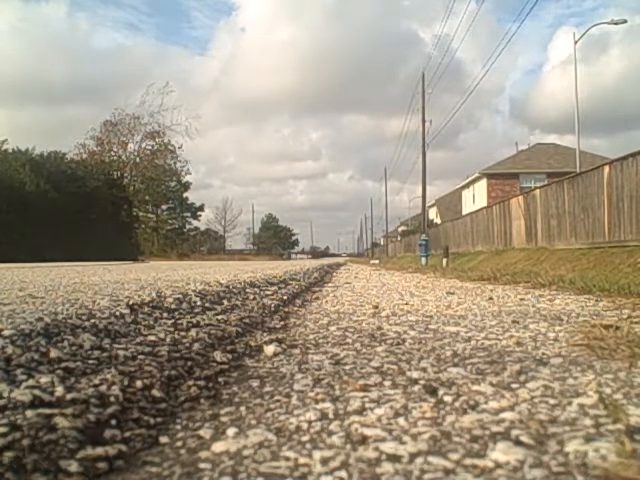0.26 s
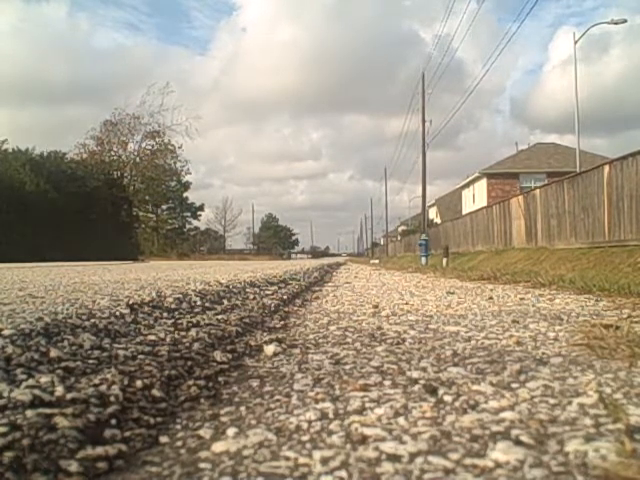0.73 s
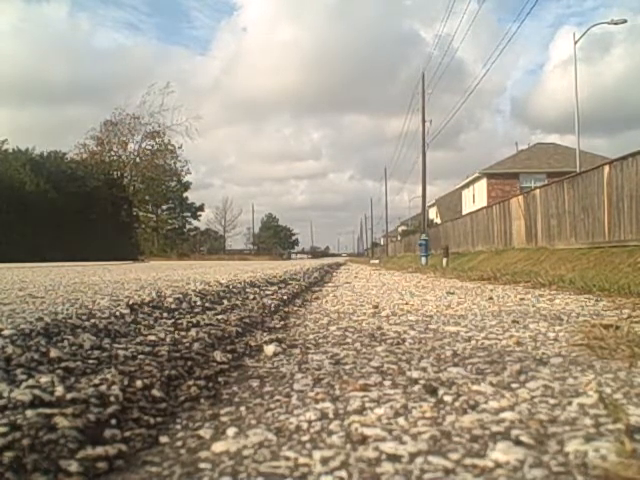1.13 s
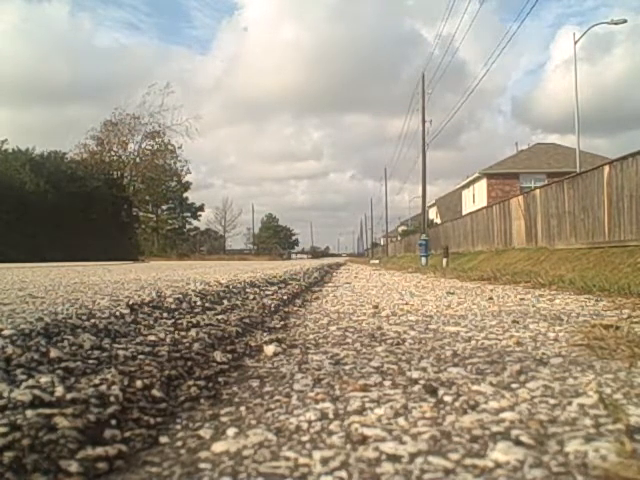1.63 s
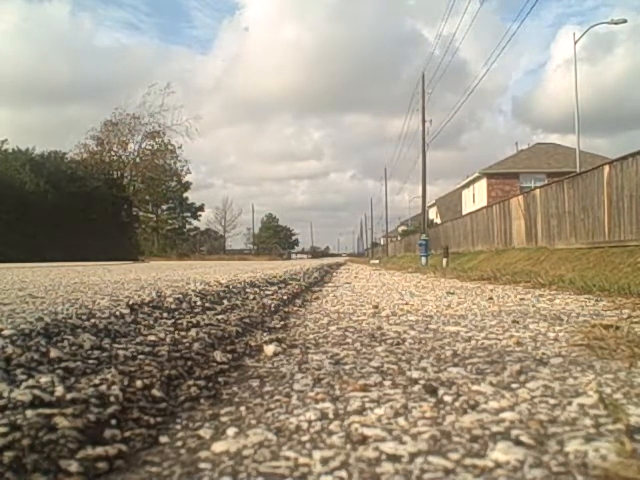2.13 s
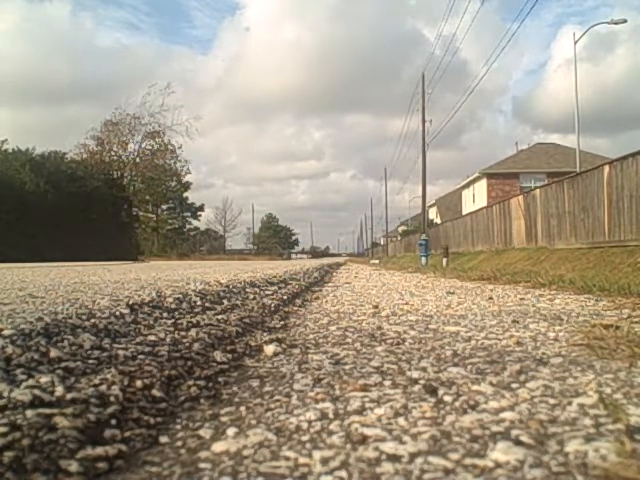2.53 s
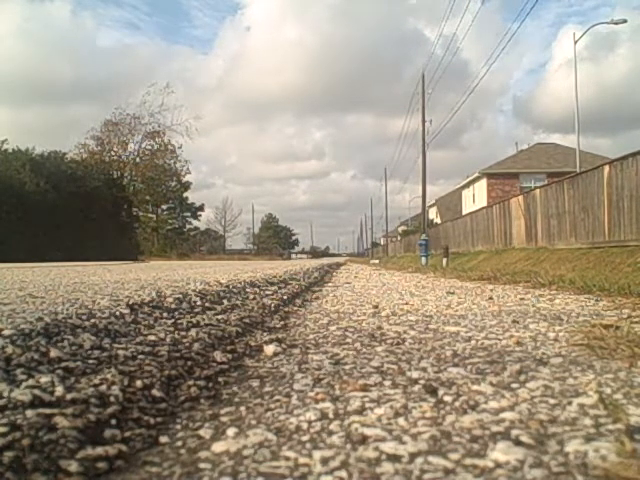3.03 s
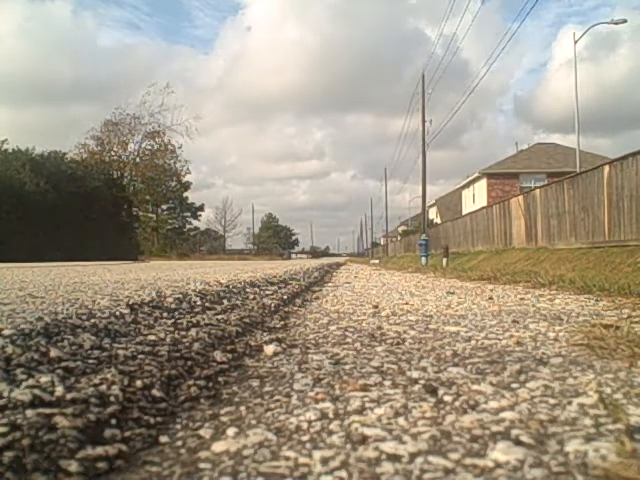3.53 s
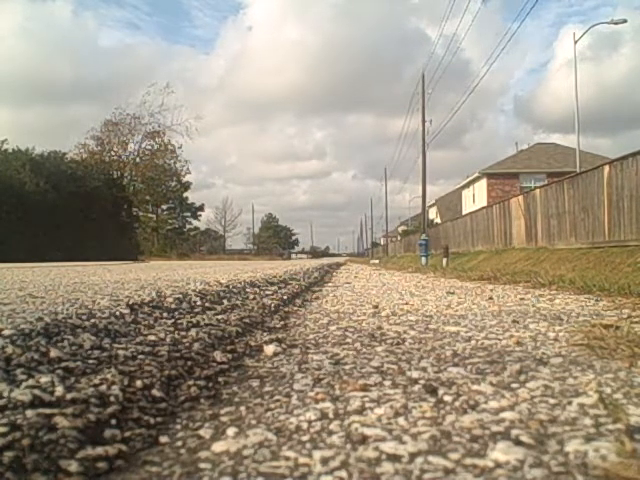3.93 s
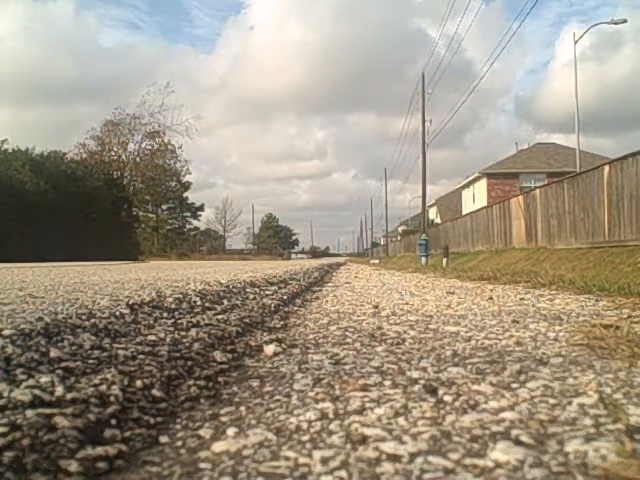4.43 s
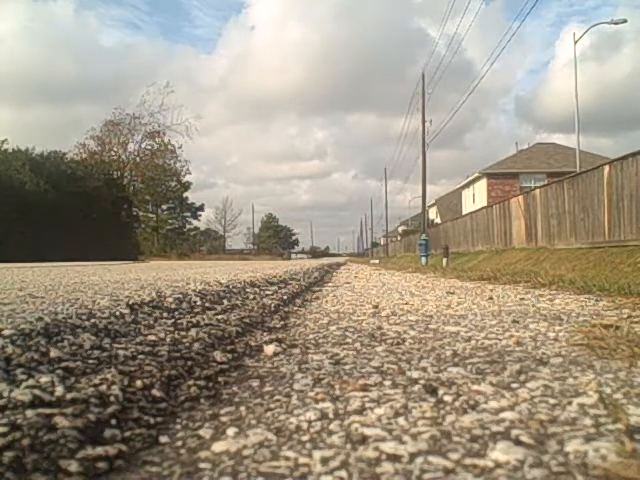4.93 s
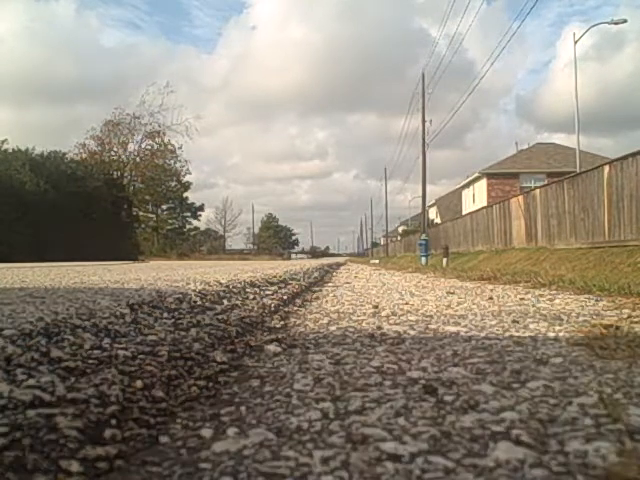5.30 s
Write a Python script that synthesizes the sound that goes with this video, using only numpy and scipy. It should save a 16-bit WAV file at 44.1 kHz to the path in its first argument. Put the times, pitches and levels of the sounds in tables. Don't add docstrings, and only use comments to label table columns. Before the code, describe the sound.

A car's low throbbing exhaust drone falls in pitch as it slows, then valve clatter and gritty tyres come right up close.

```python
import sys
import numpy as np
from scipy import signal
from scipy.fft import rfft, irfft
from scipy.io import wavfile
from scipy.ndimage import uniform_filter1d, map_coordinates

SR = 44100
rng = np.random.default_rng(int(sys.argv[2]) if len(sys.argv) > 2 else 0)


def output_pcm(signal):
    pcm = np.clip(np.atleast_2d(signal).T, -1, 1) * 32767
    wavfile.write(sys.argv[1], SR, np.round(pcm).astype(np.int16))


def amplitude_ratio(level_db):
    exponent = np.asarray(level_db, float) / 20
    return 10 ** exponent


N = 245195
T = np.arange(N) / SR

# (frequency [Hz], level [dB per Hz])
TOWN_COLOUR = [(15, -4), (28, -5.5), (50, -7.5), (75, -7), (110, -2), (150, -13), (300, -20), (600, -34),
               (1000, -36)]
# (time [s], level [dB])
FAN_LEVEL = [
    (4.2, -90),
    (4.45, -58),
    (4.7, -39),
    (5.05, -42),
    (5.2, -53),
    (5.4, -37),
    (5.56, -41),
]
# (frequency [Hz], level [dB per Hz])
TYRE_COLOUR = [(350, -4), (600, -19), (750, -4), (940, 1), (1250, 0), (1800, -1), (2150, -4), (2300, -8),
               (2700, -13.5), (3300, -21.5), (6000, -36), (9000, -55)]
# (middle [s], length [s], frequency [Hz], width [Hz], level [dB])
CAVITIES = [(3.3, 0.3, 1600, 71, -49), (3.8, 0.49, 1555, 100, -53), (4.17, 0.82, 685, 60, -47.5),
            (4.3, 0.94, 2040, 97, -52), (3.68, .35, 13800, 2200, -71), (4.35, 0.48, 2750, 300, -60),
            (4.92, .25, 830, 330, -40.5), (4.68, .25, 770, 260, -42.5), (4.55, 0.34, 175, 22, -38.5),
            (3.5, 1.0, 7950, 306, -70.5), (4.55, 0.68, 235, 50, -43.5), (3.9, 1.6, 5850, 640, -68),
            (4.92, .3, 157, 5.3, -35), (5.22, 0.26, 170, 32, -36), (4.9, 0.37, 428, 63, -42),
            (5.26, .12, 770, 320, -44), (5.46, 0.1, 740, 200, -45.5), (1.2, 1.4, 2185, 59, -65),
            (5.27, 0.37, 1450, 350, -49)]
# (time [s], frequency [Hz], level [dB], 60 dB decay [s])
THUMPS = [
    (2.09, 116.7, -30, 0.17),
    (2.09, 40, -40, .3),
    (3.92, 370, -33.5, 0.35),
    (4.42, 179.8, -28, 0.18),
    (4.58, 187.9, -25, 0.19),
    (4.825, 157.6, -24.5, .2),
    (5.015, 172, -18, 0.11),
]
# (time [s], frequency [Hz], level [dB], 60 dB decay [s])
PINGS = [(4.833, 8000, -45, 0.059), (4.833, 5400, -52, .04), (4.942, 9850, -37, 0.037),
         (5.06, 3970, -41, 0.068), (5.06, 4700, -52, 0.057), (5.06, 9900, -42, .04), (5.16, 7460, -41, .04),
         (5.192, 5150, -43, 0.092), (5.27, 6330, -40, 0.078), (5.335, 9830, -35, .04),
         (5.485, 9500, -34, 0.049), (5.405, 4000, -44, 0.053), (5.125, 6830, -41, .04),
         (5.195, 10000, -41, .04), (5.08, 13500, -47, .04), (5.515, 6900, -37, 0.052),
         (5.515, 13500, -40, 0.064)]
# (time [s], clatter depth [0-1])
CAM_TURNS = [(4.21, .1), (4.32, .3), (4.422, 0.68), (4.52, 0.63), (4.621, 0.7), (4.73, 0.8), (4.835, 1.1),
             (4.943, 0.55), (5.063, 1.06), (5.194, 1), (5.337, 0.82), (5.488, 0.5), (5.65, .45)]
VALVE_LEVELS = [7, 1.2, 2, -2]
# (frequency [Hz], level [dB per Hz])
BAY_COLOUR = [(1290, -28), (2200, -2), (2700, 4.5), (3350, -2), (3860, -0.5), (7460, -6), (9020, -7.5),
              (9790, -4.5), (12000, -8.5), (14200, -8.5), (15800, -12)]
# (time [s], level [dB], treble change [dB])
BAY_SHADE = [
    (0, -71, 0),
    (2.2, -59.5, -10.5),
    (2.7, -53, -5),
    (3.1, -53.5, -7.5),
    (3.65, -53.5, -6.5),
    (4.45, -55, -2.5),
    (4.7, -53, 0.5),
    (5.25, -47.5, 3.5),
    (5.56, -42.5, 4),
]
# (frequency [Hz], level [dB per Hz])
GAS_COLOUR = [(200, 0.5), (300, 0.5), (420, -0.5), (560, -3.5), (750, -3), (950, -17), (1300, -9)]
# (frequency [Hz], width [Hz], level [dB])
PIPE_MODES = [(165.7, 48.5, 8.5), (204, 66, -3.5), (128, 17, -2), (233, 26, -10), (400, 140, -24),
              (90, 11, 5)]
# (time [s], swell [dB])
SURGES = [(3.85, 6), (4.1, 9), (4.43, 7.5), (4.6, 7.5), (4.84, 6), (5.0, 5), (5.22, 6.5), (5.38, 3.5)]
# (time [s], firing rate [Hz], first order level [dB])
FIRING = [(0, 121, -35.5), (.28, 114.5, -34.5), (.6, 109.5, -34), (.83, 105.7, -43), (1.2, 99.33, -38.5),
          (1.58, 90.8, -35.5), (2.04, 82.5, -36), (2.2, 83, -40.5), (2.44, 95.98, -38.5),
          (2.57, 103.7, -36), (2.65, 105.5, -29), (2.97, 97, -28.5), (3.4, 81.6, -28), (3.82, 66.55, -24.5),
          (4.2, 53.6, -31.5), (4.6, 38, -36), (4.92, 38, -48), (5.27, 26.84, -42.5)]
CANCELLATIONS = [-.015, .096, .212, .315, .435, .545, .67, .819, .968, 1.156, 1.341, 1.65, 1.9, 2.15, 2.318,
                 2.396, 2.485, 2.562, 2.62, 2.67, 2.72, 2.77]
# (time [s], level [dB])
ECHO_LEVEL = [
    (0, -3.5),
    (.25, -2),
    (.55, -3.5),
    (.85, -.7),
    (1.34, -2.5),
    (1.62, -24),
    (1.98, -22),
    (2.15, -2.5),
    (2.35, -7),
    (2.77, -24),
]
# (frequency [Hz], level [dB])
PASSAGE = [(52, -42), (80, -31.5), (96, -40.5), (110, -26.5), (143, -43), (184, -35), (203, -50),
           (240, -40.5)]
# (multiple of the firing rate, level [dB])
UPPER_ORDERS = [(3, -52), (4, -53.5), (5, -61)]
# (time [s], nearness [dB])
NEARNESS = [(0, -10.5), (1.2, -8.5), (2.2, -5.5), (2.55, -3.5), (2.9, -1), (3.6, -.5), (4.2, 0.6),
            (4.7, 2.5), (5.56, 2.5)]


def curves(table):
    s, *columns = np.transpose(table)
    return [np.interp(T, s, column) for column in columns]


def unit(x):
    return x / np.sqrt(np.mean(x ** 2))


def bump(middle_s, width_s):
    return np.exp(-((T - middle_s) / width_s) ** 2)


def walk(rate_hz):
    hold = int(SR / rate_hz)
    steps = np.repeat(rng.standard_normal(N // hold + 1), hold)
    smooth = uniform_filter1d(uniform_filter1d(steps, hold), hold)
    return 1.32 * smooth[:N]


def colour(x, points):
    hz, db = np.transpose(points)
    log_hz = np.log(np.fft.rfftfreq(N, 1 / SR) + 1)
    gain = amplitude_ratio(np.interp(log_hz, np.log(hz), db, left=-80, right=-80))
    return unit(irfft(rfft(x) * gain, N))


def noise(points):
    return colour(rng.standard_normal(N), points)


def ring(x, hz, width_hz):
    return signal.lfilter(*signal.iirpeak(hz, hz / width_hz, fs=SR), x)


def rings(events, rise_s, spread):
    out = np.zeros(N)
    detune = 1 + spread * rng.standard_normal((len(events), 3))
    for (s, hz, db, t60), shift in zip(events, detune):
        age = np.maximum(T - s, 0)
        modes = np.sin(2 * np.pi * hz * shift[:, None] * age).sum(axis=0) / np.sqrt(3)
        out += amplitude_ratio(db - 60 * age / t60) * (1 - np.exp(-age / rise_s)) * modes
    return out


def town():
    return amplitude_ratio(-48.5 + 1.8 * walk(4.2)) * noise(TOWN_COLOUR)


def fan():
    fan_hz = 48.26
    (fan_db,) = curves(FAN_LEVEL)
    return np.sqrt(2) * amplitude_ratio(fan_db + 3.3 * walk(10)) * np.sin(2 * np.pi * fan_hz * T)


def tyres(near_db):
    speed = 1 - 0.12 * T
    tyre_db = -34.5 + near_db + 29 * np.log10(speed)
    return amplitude_ratio(tyre_db + 0.46 * walk(8)) * noise(TYRE_COLOUR)


def grit():
    ticks_per_s, scatter_db, fizz_s, start_s = 450, 6.5, 0.0013, 4.57
    chance = rng.random((2, N))
    ticks = (chance[0] < ticks_per_s / SR) * amplitude_ratio(-scatter_db * np.log(chance[1] + .01))
    tails = signal.lfilter([1], [1, -np.exp(-1 / (fizz_s * SR))], ticks)
    fizz = tails * rng.standard_normal(N)
    fade_in = np.clip((T - start_s) / .4, 0, 1)
    return fade_in * colour(fizz, [(2500, -14), (4500, 2), (12000, -1), (16000, 0)])


def cavities():
    sag_per_s = .04
    out = np.zeros(N)
    for s, length, hz, width, db in CAVITIES:
        turns = np.cumsum(hz * (1 - sag_per_s * (T - s))) / SR
        k = int(SR / width)
        sway = uniform_filter1d(uniform_filter1d(rng.standard_normal((2, N)), k), k)
        band = sway[0] * np.cos(2 * np.pi * turns) + sway[1] * np.sin(2 * np.pi * turns)
        out += amplitude_ratio(db) * bump(s, length / 2) * unit(band)
    return out


def engine_bay():
    (depth,) = curves(CAM_TURNS)
    starts = np.array(CAM_TURNS)[:, 0]
    quarter = 4 * np.interp(T + 0.0062, starts, np.arange(len(CAM_TURNS)), left=-.1)
    valve = np.floor(quarter).astype(int)
    size = amplitude_ratio(np.array(VALVE_LEVELS)[valve % 4] + .8 * rng.standard_normal(64)[valve])
    since = quarter % 1
    shape = np.minimum(since / 0.21, 1) * np.exp(-since / 0.36)
    burst = (T > CAM_TURNS[0][0]) * depth * size * shape
    steady = amplitude_ratio(0.37 * walk(9.06)) * noise(BAY_COLOUR)
    seats = noise(BAY_COLOUR)
    seats = unit(seats + 0.8 * ring(seats, 4840, 900) + 1.3 * ring(seats, 8300, 1600))
    return 0.97 * steady + 2.15 * burst * seats


def shaded(x):
    low = signal.sosfiltfilt(signal.butter(1, 8000., fs=SR, output="sos"), x)
    return low + amplitude_ratio(curves(BAY_SHADE)[1]) * (x - low)


def bounced(x):
    share = 0.065
    delay_ms = 0.62 - .017 * T
    late = map_coordinates(x, [np.arange(N) - delay_ms * SR / 1000], order=3)
    return (x + share * late) / np.sqrt(1 + share ** 2)


def front_of_car():
    grit_db = -7.5
    return amplitude_ratio(curves(BAY_SHADE)[0]) * bounced(shaded(engine_bay()) + amplitude_ratio(grit_db) * grit())


def gas(near_db):
    return amplitude_ratio(-41.5 + near_db + 0.89 * walk(8.5)) * noise(GAS_COLOUR)


def burble(turns, hz, near_db):
    at = np.flatnonzero(np.diff(np.floor(turns)))
    chance = rng.standard_normal((len(at), 2))
    late = (.04 * chance[:, 0] * SR / hz[at]).astype(int)
    pulses = np.zeros(N)
    pulses[np.clip(at + late, 0, N - 1)] = amplitude_ratio(2.85 * chance[:, 1]) / np.sqrt(hz[at])
    puffs = (0.37 + np.exp(-(turns % 1) / 0.33)) * rng.standard_normal(N)
    push = 0.66 * unit(pulses) + 0.86 * unit(puffs)
    pipe = np.zeros(N)
    for k, (f, width, db) in enumerate(PIPE_MODES):
        mode = ring(ring(push, f, 1.4 * width), f, 1.4 * width)
        pipe += (-1) ** k * amplitude_ratio(db) * mode
    swell_db = sum(db * bump(s, 0.06) for s, db in SURGES)
    pipe_db = -42. + 1.51 * near_db + swell_db
    return amplitude_ratio(pipe_db + 1.5 * walk(14)) * unit(pipe)


def drone(turns, hz, near_db):
    first_db, (echo_db,) = curves(FIRING)[1], curves(ECHO_LEVEL)
    echo_db = echo_db - 40 * (T > CANCELLATIONS[-1])
    slip = np.interp(T, CANCELLATIONS, np.arange(len(CANCELLATIONS)) + .5)
    slip = uniform_filter1d(slip, size=2500)
    echo_turns = turns - slip
    first = np.sin(2 * np.pi * turns) + amplitude_ratio(echo_db) * np.sin(2 * np.pi * echo_turns)

    clutch_db = -13 * bump(2.303, .25) - 11 * bump(4.95, .2)
    at_hz, pass_db = np.transpose(PASSAGE)
    second_db = 0.88 * near_db + clutch_db + np.interp(np.log(2 * hz), np.log(at_hz), pass_db)
    second = np.sin(4 * np.pi * turns + 1.46)
    second += amplitude_ratio(echo_db - 3.0) * np.sin(4 * np.pi * echo_turns + 3.0)
    second *= amplitude_ratio(second_db + 2.04 * walk(11))

    labour_db = 12.5 * bump(4.13, 0.15)
    upper_db = 1.27 * near_db - 7.5 * np.log2(hz / 60) + labour_db
    upper = np.zeros(N)
    for k, db in UPPER_ORDERS:
        upper += amplitude_ratio(upper_db + db + 3.6 * walk(12)) * np.sin(2 * np.pi * round(k) * turns + 3.12)

    gear = amplitude_ratio(-50.5 + 2.5 * walk(15)) * bump(3.0, .22) * np.sin(2 * np.pi * 4.55 * turns)
    return np.sqrt(2) * (amplitude_ratio(first_db) * first + second + upper + gear)


def scene():
    hz = uniform_filter1d(curves(FIRING)[0], size=4000)
    turns = np.cumsum(hz * (1 + 0.0029 * walk(25))) / SR
    (near_db,) = curves(NEARNESS)
    car = fan() + tyres(near_db) + cavities()
    car += rings(THUMPS, 0.017, 0.0027) + rings(PINGS, 0.0032, 0.0235)
    car += front_of_car()
    car += gas(near_db) + burble(turns, hz, near_db) + drone(turns, hz, near_db)
    return (town() + car)[None]


def low_pass(x):
    return signal.sosfilt(signal.butter(12, 16140, fs=SR, output="sos"), x)


def record(dry):
    whine_hz, top_hz = 15272, 15690
    hiss = amplitude_ratio(-71) * rng.standard_normal(N)
    whine = np.sqrt(2) * amplitude_ratio(-83 + .8 * walk(30)) * np.sin(2 * np.pi * whine_hz * T)
    top = signal.ellip(12, .3, 70, top_hz, fs=SR, output="sos")
    mix = signal.sosfilt(top, dry + hiss + whine)
    return low_pass(mix)


dry = scene()
out = record(dry)
output_pcm(out)
```